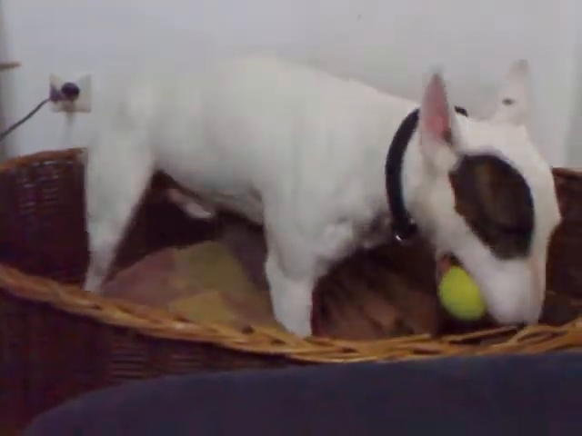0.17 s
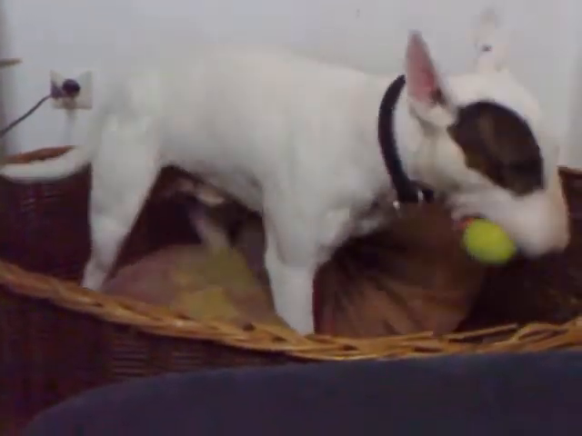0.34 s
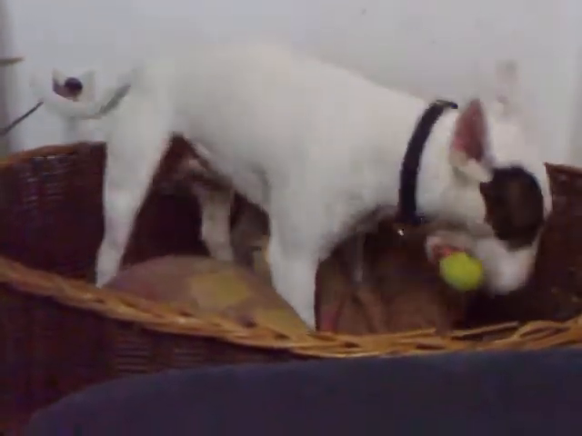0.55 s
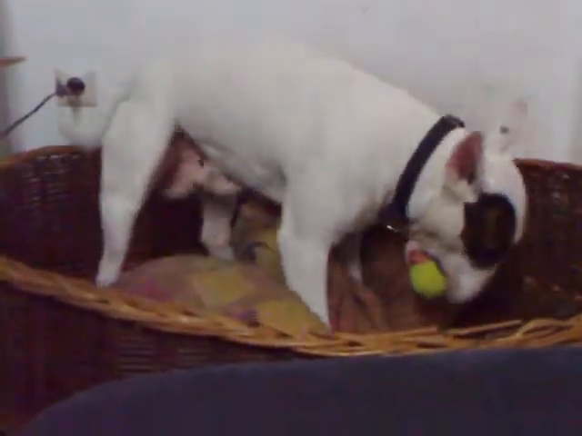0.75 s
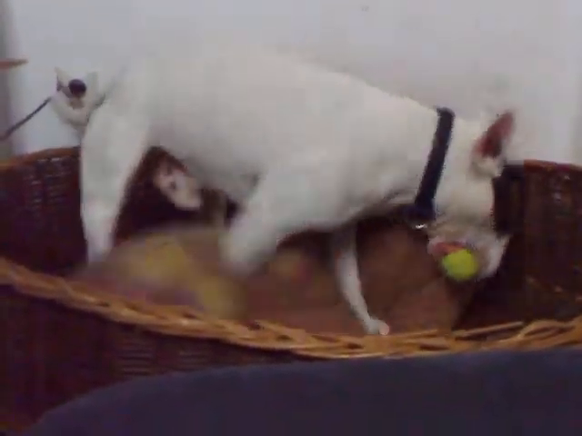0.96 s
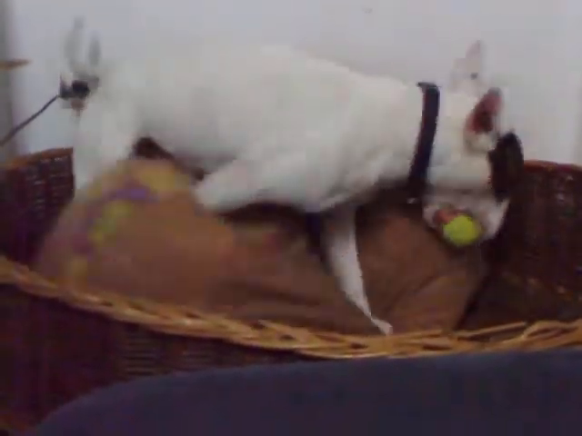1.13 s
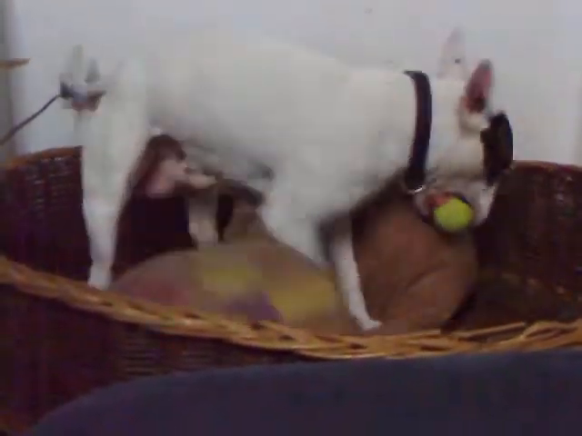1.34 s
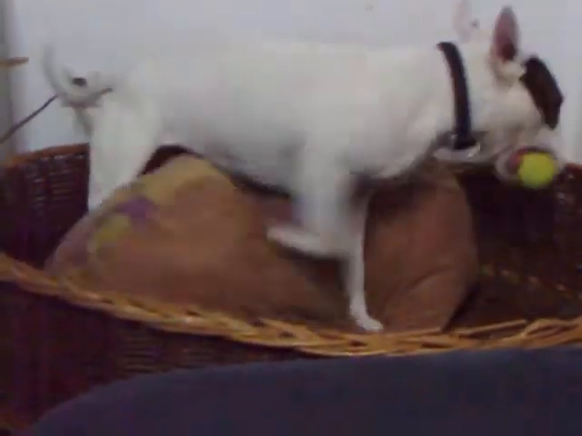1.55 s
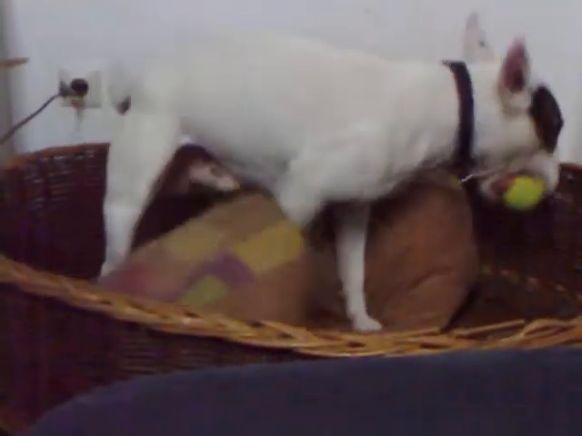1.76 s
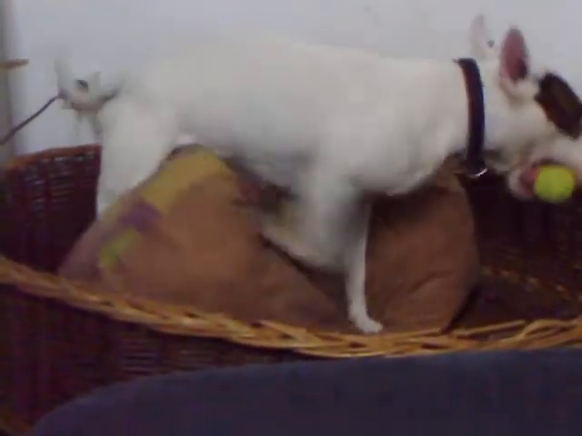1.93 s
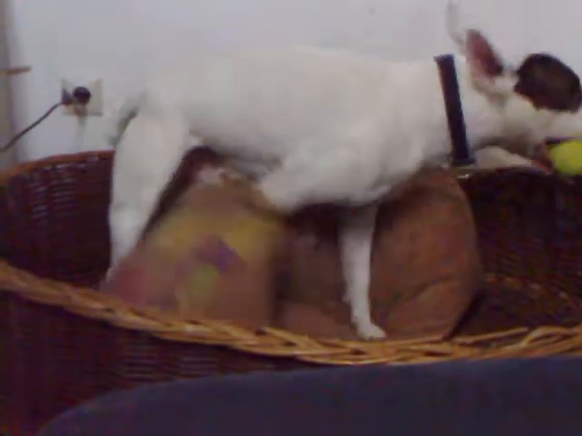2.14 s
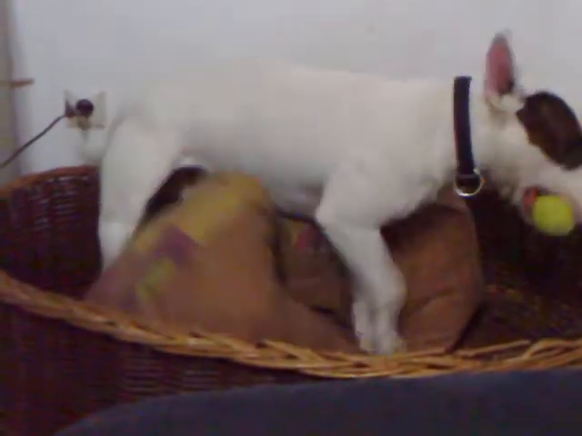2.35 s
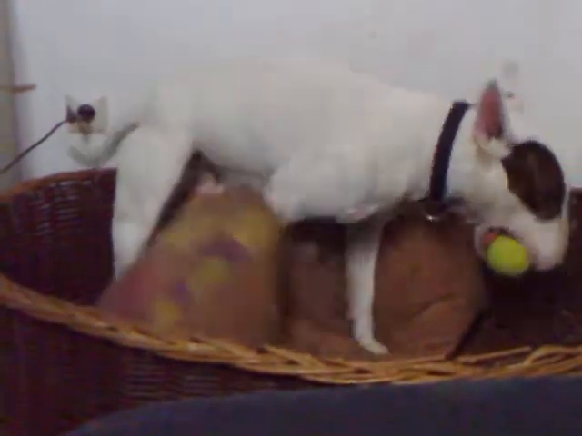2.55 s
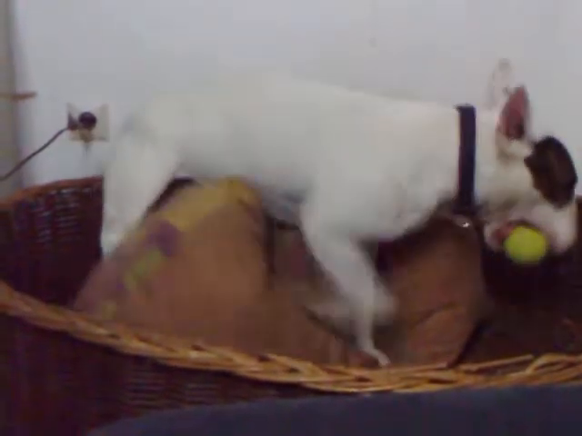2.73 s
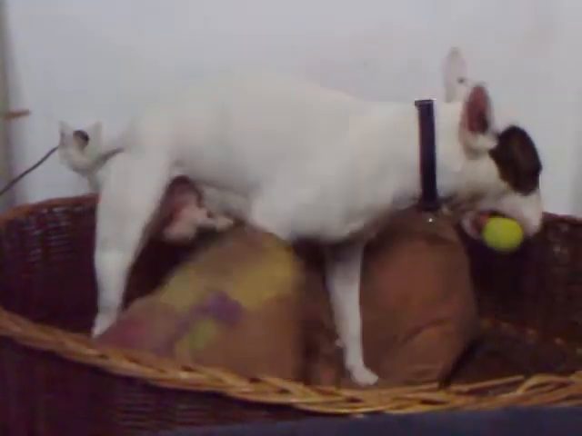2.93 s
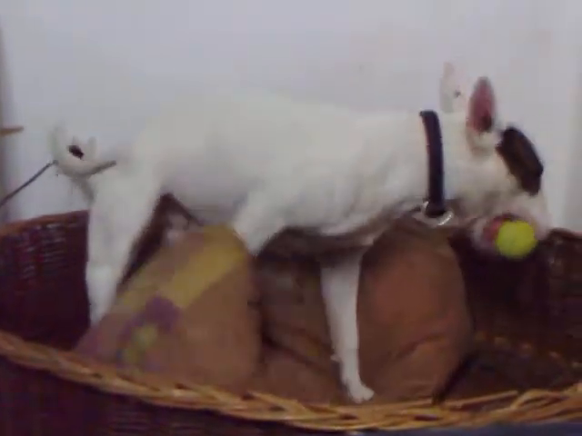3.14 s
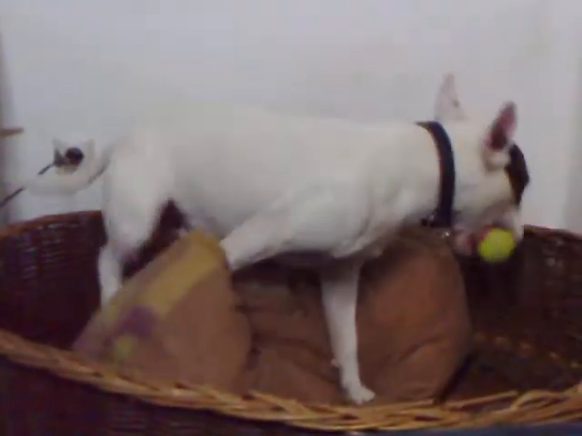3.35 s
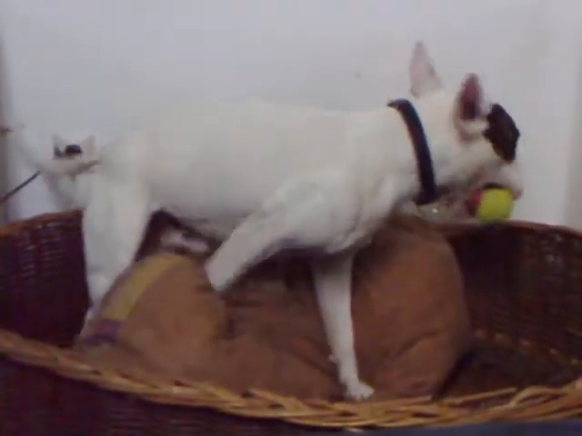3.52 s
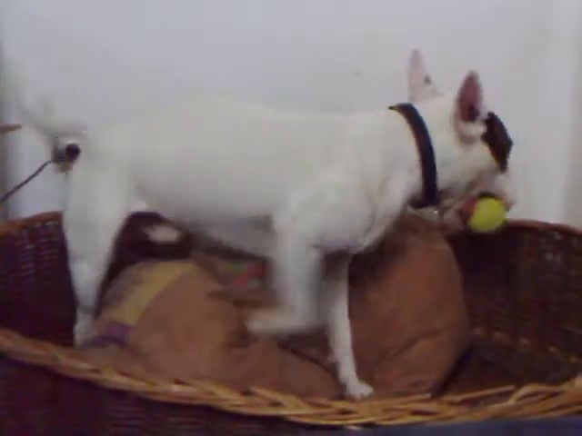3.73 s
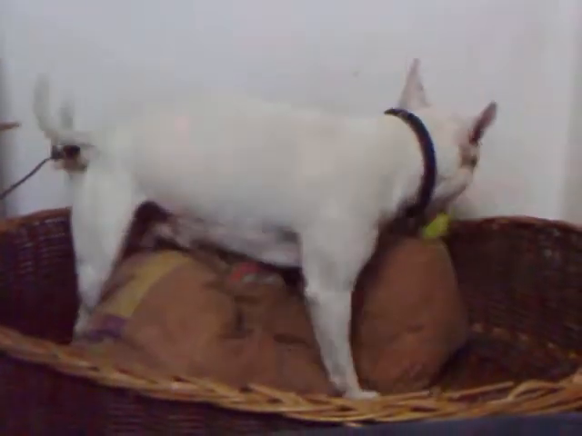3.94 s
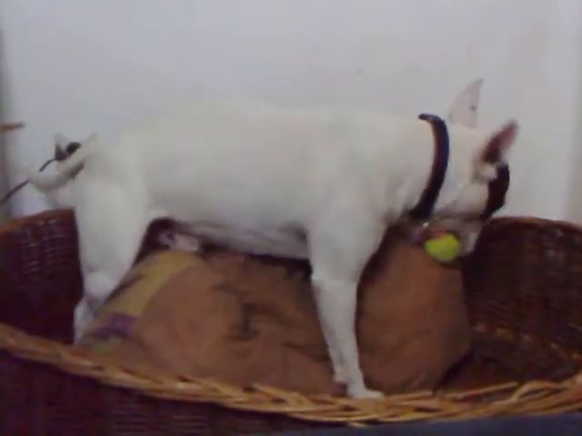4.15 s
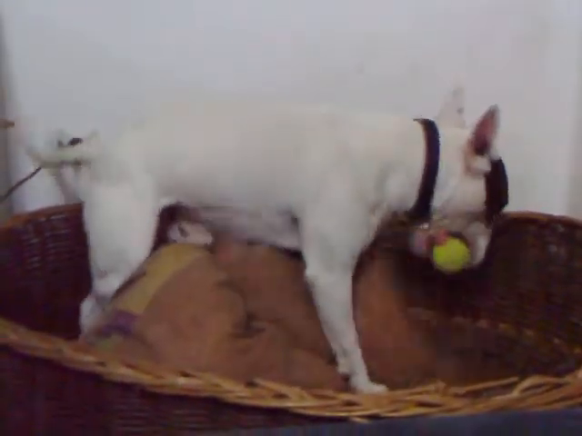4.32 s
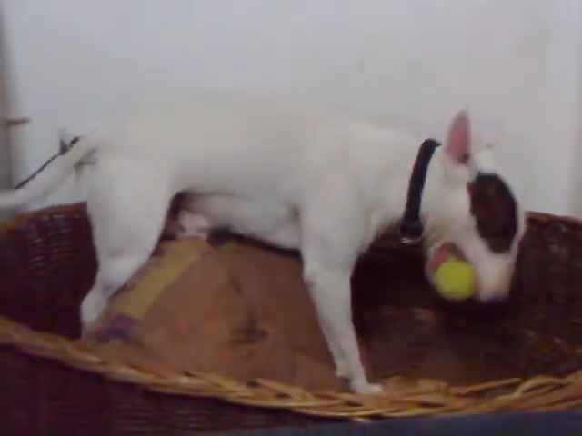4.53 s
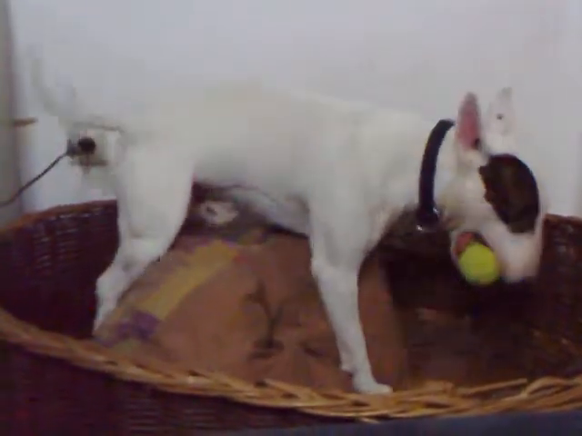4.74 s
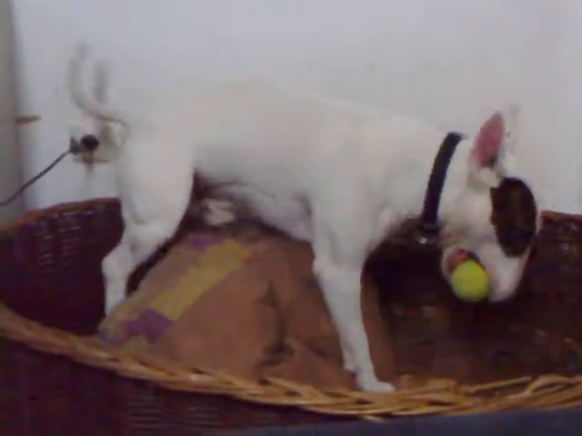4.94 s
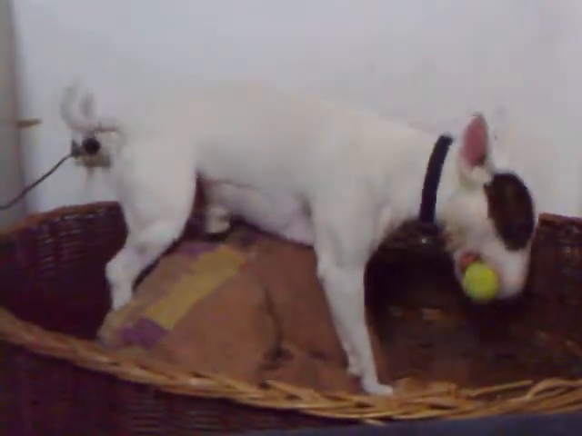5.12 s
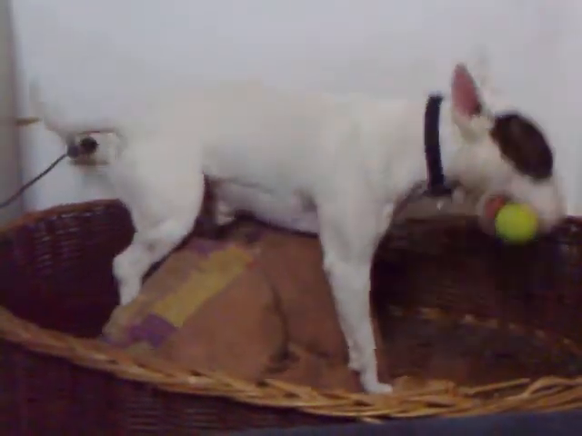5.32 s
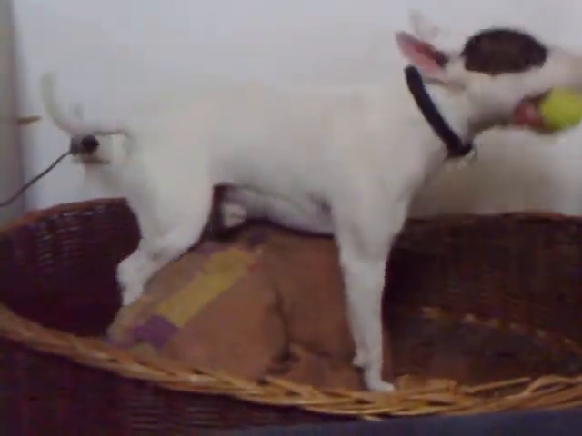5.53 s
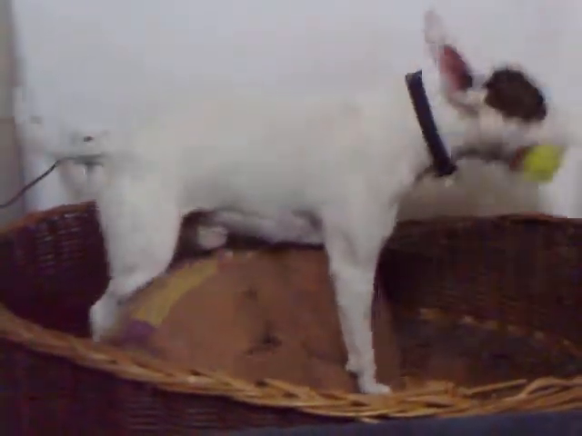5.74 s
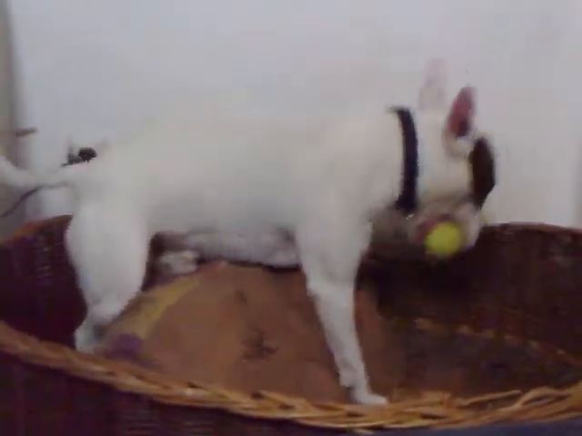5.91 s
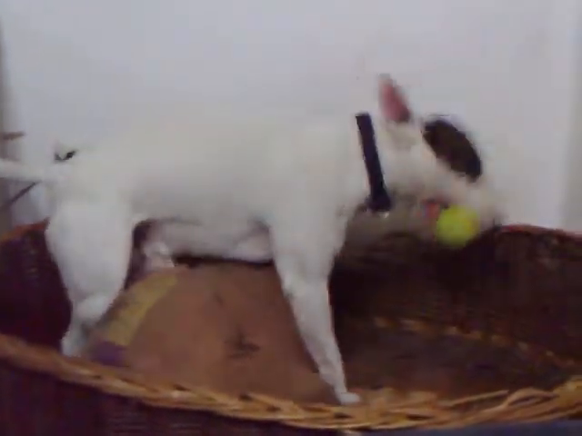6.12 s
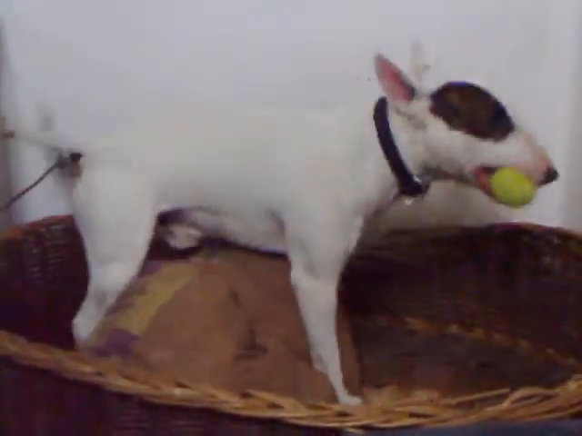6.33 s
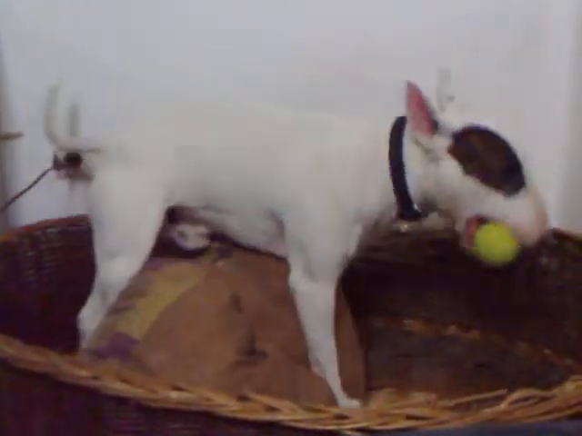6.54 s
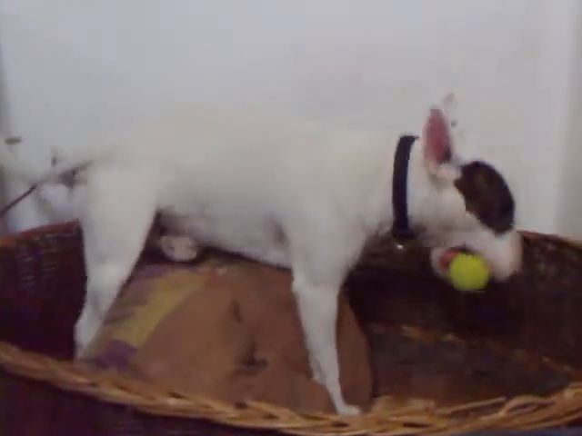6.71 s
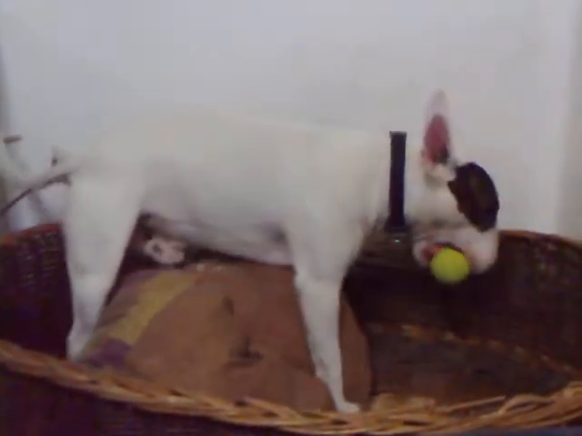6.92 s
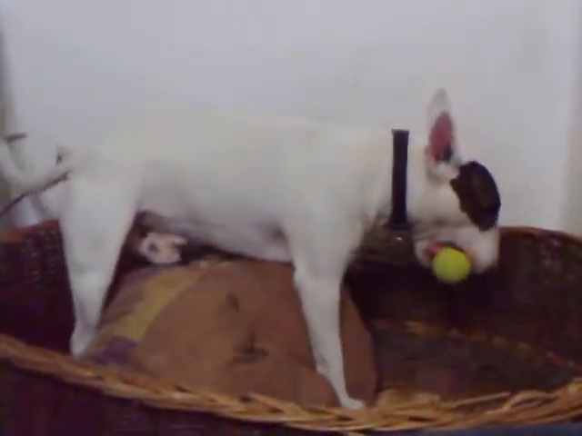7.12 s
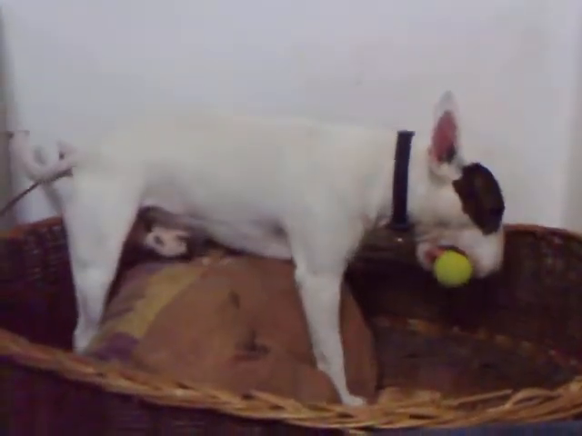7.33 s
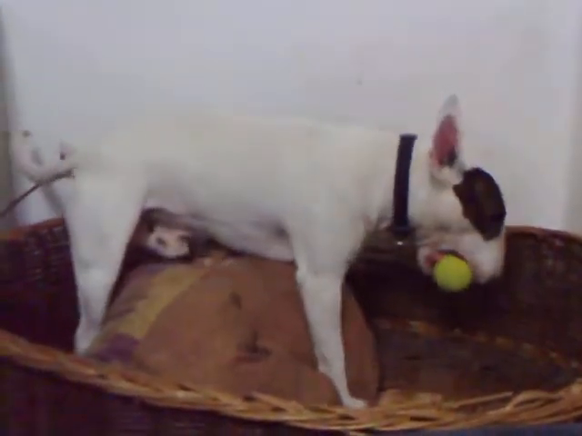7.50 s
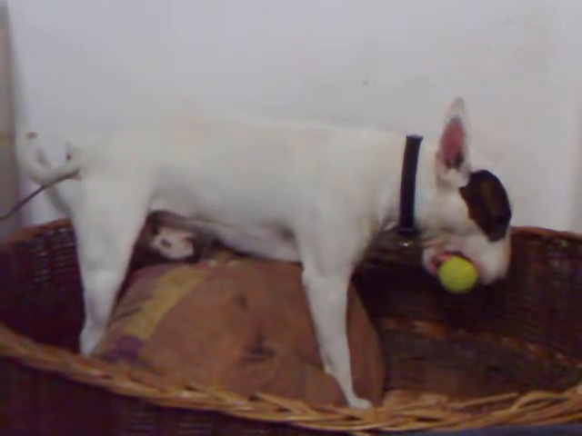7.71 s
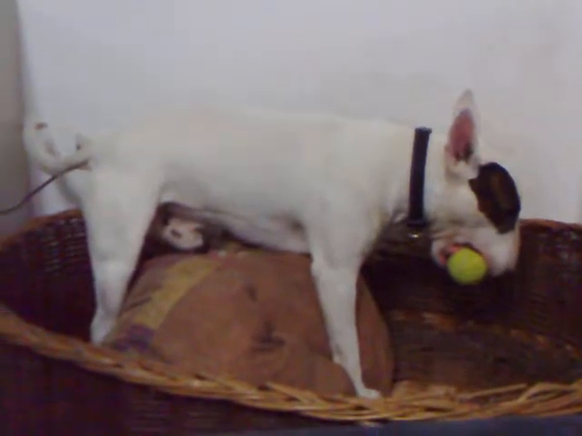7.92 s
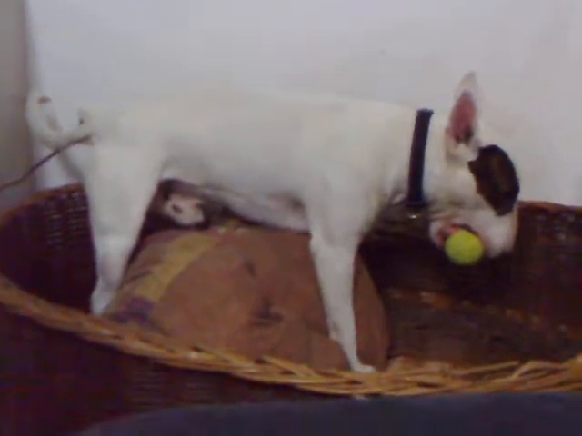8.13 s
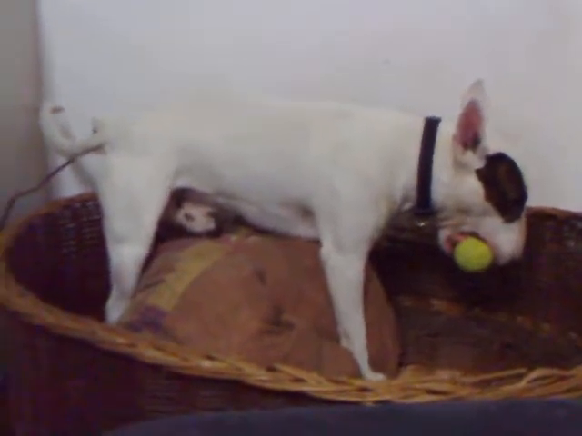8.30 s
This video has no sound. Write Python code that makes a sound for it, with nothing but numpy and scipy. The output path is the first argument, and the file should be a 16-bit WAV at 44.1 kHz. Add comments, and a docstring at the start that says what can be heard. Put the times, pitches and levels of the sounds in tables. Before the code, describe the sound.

Close, dry pawing and scratching on cloth in a creaky wicker bed, an early rubbery squeak, padded thumps, then a short muzzle snuffle and quiet.

```python
"""A small room, the microphone close to a wicker basket: a dog with a ball in its mouth paws at the cushion.
Strokes begin at once over a steady room tone; a third of a second in, the ball gives one short squeak.
For seven seconds claws scrape the cloth, rub through the hollow basket and shove the stuffing, by one rule
of swell and fade over the slow shifting of the dog's weight, while paws thud and wicker crackles and snaps.
The strokes end in a soft snuffle of air noise through the muzzle, then room tone and one last faint thud."""
import sys
import numpy as np
from scipy import signal
from scipy.fft import rfft, irfft
from scipy.io import wavfile

SR = 44100
rng = np.random.default_rng(int(sys.argv[2]) if len(sys.argv) > 2 else 0)


def pcm_store(signal):
    """Save signal as 16-bit PCM."""
    levels = np.round(np.clip(np.atleast_2d(signal), -1, 1) * 32767)
    wavfile.write(sys.argv[1], SR, levels.astype(np.int16).T)


N = 368676


def from_db(db):
    """Decibels to gain."""
    return 10 ** (np.asarray(db) / 20)


def rms_one(x):
    """Scale to rms 1."""
    return x / np.sqrt(np.mean(x ** 2) + 1e-20)


def in_time(rows):
    """Each column of a curve, at every sample."""
    s, *columns = np.transpose(rows)
    return [np.interp(np.arange(N) / SR, s, column) for column in columns]


def add(out, s, sound):
    """Mix a sound in at time s."""
    start = max(0, round(s * SR))
    out[start:start + len(sound)] += sound[:max(0, N - start)]


def colour(x, points):
    """Causal (minimum-phase) filter that follows a spectrum's shape; white noise keeps its level."""
    hz, db = np.transpose(points)
    grid = np.maximum(np.fft.rfftfreq(8192, 1 / SR), 1)
    gain = from_db(np.interp(np.log(grid), np.log(hz), db))
    # folding the cepstrum onto positive times makes the phase minimal
    cepstrum = irfft(np.log(gain))
    cepstrum[1:len(grid) - 1] *= 2
    cepstrum[len(grid):] = 0
    response = irfft(np.exp(rfft(cepstrum)))
    return signal.fftconvolve(x, response / np.linalg.norm(response))[:len(x)]


def drift(rate):
    """Random curve of rms 1: straight lines between rate random values a second."""
    knots = rng.standard_normal(4000)
    return rms_one(np.interp(np.arange(N) / SR * rate, np.arange(len(knots)), knots))


def slips(per_s, spread_db, size=N):
    """Stick and slip: clicks of uneven size and either sign at random moments; rms 1."""
    sizes = from_db(spread_db * np.minimum(rng.exponential(1, size), 4))
    signs = rng.choice([-1, 1], size)
    happens = rng.random(size) < per_s / SR
    return rms_one(sizes * signs * happens)


def resonance(hz, width_hz):
    """Coefficients of a two-pole band-pass with gain about 1 on top."""
    r = np.exp(-np.pi * width_hz / SR)
    return (1 - r * r) / 2 * np.array([1, 0, -1]), [1, -2 * r * np.cos(2 * np.pi * hz / SR), r * r]


def resonate(x, modes):
    """Drive a few broad modes in parallel, with alternating sign; rms 1."""
    ringing = 0
    for k, (hz, width, db) in enumerate(modes):
        ringing = ringing + (-1) ** k * from_db(db) * signal.lfilter(*resonance(hz, width), x)
    return rms_one(ringing)


def shifting(x, low_hz, high_hz, depth_db, count=7):
    """The contact wanders over the surface, so neighbouring bands swell and fade by chance; rms 1."""
    centres = np.geomspace(low_hz, high_hz, count)
    widths = centres * (centres[1] / centres[0] - 1)
    moved = x
    for hz, width in zip(centres, widths):
        change = from_db(depth_db * drift(28)) - 1
        moved = moved + change * signal.lfilter(*resonance(hz, width / 2), x)
    return rms_one(moved)


def narrowed(x, rows):
    """For a while a share of the sound's power gathers in one ringing band."""
    t, kept, bands = np.arange(N) / SR, np.ones(N), np.zeros(N)
    for s, length, hz, width, share in rows:
        span = slice(max(0, int((s - 2 * length) * SR)), int((s + 2 * length) * SR))
        part = np.clip(share, 0, .95) * np.exp(-2 * ((t[span] - s) / length) ** 2)
        sharp = resonance(hz, width * np.sqrt(2))  # wider, because it is passed twice
        grit = slips(per_s=3500, spread_db=1.0, size=len(part))
        band = signal.lfilter(*sharp, signal.lfilter(*sharp, grit))
        bands[span] += np.sqrt(part) * rms_one(band)
        kept[span] *= 1 - part
    return np.sqrt(kept) * x + bands


# Spectrum of the quiet room. Each row: frequency in Hz, relative level in dB per Hz.
ROOM_TONE_SPECTRUM = [(15, -37), (25, 4.5), (33, -6.5), (58, -1.5), (140, -10), (173, -12), (204, -11),
                      (221, -11.5), (289, -15), (1530, -26), (4260, -27), (5880, -33), (7500, -30),
                      (8350, -28), (15500, -25)]


def room_tone(level_db=-56):
    """Steady noise coloured like the empty room."""
    return from_db(level_db) * rms_one(colour(rng.standard_normal(N), ROOM_TONE_SPECTRUM))


def room(x, gap_s=0.0038, t60_s=0.33, tail_db=-12):
    """Close walls return a dense, short and slightly dull tail."""
    t = np.arange(SR // 2) / SR
    echoes = rng.standard_normal(len(t)) * from_db(-60 * t / t60_s) * (t > gap_s)
    tail = colour(echoes, [(100, -2.5), (700, -3.5), (3000, -5.0), (12000, -7.5)])
    return x + from_db(tail_db) * signal.fftconvolve(x, tail / np.linalg.norm(tail))[:N]


# The dog snuffles past the ball as it settles. Each row: time in seconds, level in dB.
SNUFFLE_LEVEL = [(7.09, -85), (7.14, -54), (7.18, -49.5), (7.215, -46.5), (7.26, -51.5), (7.32, -60.5),
                 (7.42, -79), (7.5, -100)]
# Resonances of the muzzle. Each row: frequency in Hz, width in Hz, relative level in dB.
MUZZLE_MODES = [(536, 130, -4.5), (726, 79, -3.5), (940, 71, 0.5), (2110, 160, 3.5), (2650, 270, -1.5),
                (3400, 1300, -11)]


def snuffle(top_hz=4200):
    """Smooth air noise excites the resonances of the dog's muzzle."""
    db, = in_time(SNUFFLE_LEVEL)
    band = signal.butter(2, [450, top_hz], "band", fs=SR, output="sos")
    air = signal.sosfilt(band, rng.standard_normal(N))
    return from_db(db) * resonate(air, MUZZLE_MODES)


# Rubbery squeak. Each row: time in seconds, mean pitch in Hz, level of the fundamental in dB.
SQUEAK_CURVE = [(.255, 365.6, -66), (.266, 392, -31), (.279, 405, -30), (.289, 442, -28.5),
                (.298, 449, -30), (.304, 455, -40), (.312, 523, -48), (.322, 525, -31), (.335, 560, -41),
                (.345, 567, -70)]


def squeak(overtone_db=-24.0, bright_hz=2350):
    """A nearly pure, rising, slightly rough note whose faint overtones gather in one band."""
    hz, db = in_time(SQUEAK_CURVE)
    phase = 2 * np.pi * np.cumsum(hz * (1 + 0.016 * drift(293))) / SR
    harmonics = sum(np.sin(k * phase) for k in range(2, 9))
    overtones = signal.lfilter(*resonance(bright_hz, width_hz=1000), harmonics)
    sounding = db > max(db[0], db[-1])  # silent before and after the curve
    return (np.sin(phase) + from_db(overtone_db) * overtones) * from_db(db) * sounding


# Spectrum of claws on cloth. Each row: frequency in Hz, relative level in dB per Hz.
CLOTH_SPECTRUM = [(500, -6.5), (1250, -8.5), (1600, -3.5), (2050, 0.5), (2750, -1.5), (3200, -5),
                  (4200, -10), (5200, -18.5), (6300, -23.5), (8000, -24.5), (15000, -45)]
# Modes of the hollow basket. Each row: frequency in Hz, width in Hz, relative level in dB.
HOLLOW_MODES = [(295, 58, -0.5), (448, 41, 2), (559, 87, 4), (759, 95, 1.5), (884, 106, 2),
                (1044, 390, -3.5)]
# Claws knocking through the cloth on the basket. Each row: start in seconds, starting level of the cloth
# part in dB, time to fall by 30 dB in seconds, level of the hollow against the cloth in dB.
KNOCK_EVENTS = [(.037, -39, 0.017, -1), (0.316, -25, 0.017, -8), (.984, -43, .02, -12),
                (1.067, -33, .018, -11), (1.557, -44, 0.02, 8), (1.624, -28, .1, -11),
                (2.019, -45, 0.034, -4), (2.27, -47, 0.016, -10), (2.682, -49.5, 0.048, 6),
                (2.988, -48, .01, 16), (3.05, -46.5, 0.016, 10.5), (3.371, -44, 0.048, -10),
                (3.486, -38, 0.017, -18), (4.604, -32, .04, 2.5), (4.806, -43, 0.024, -15),
                (5.1, -45, 0.016, -18), (5.176, -49.5, 0.023, 8.5), (5.341, -39, 0.3, 1.5),
                (5.865, -45.5, .025, -15), (5.982, -47, .02, -8), (6.35, -30.5, 0.095, -1),
                (7.012, -48.5, 0.015, 9)]


def knocks():
    """A hard dab of the claws rasps the cloth and wakes the hollow at once."""
    out, t = np.zeros(N), np.arange(SR // 4) / SR
    for s, db, length, hollow_db in KNOCK_EVENTS:
        grit = slips(per_s=3700, spread_db=0.5, size=len(t))
        dab = colour(grit, CLOTH_SPECTRUM) + from_db(hollow_db) * resonate(grit, HOLLOW_MODES)
        add(out, s, dab * from_db(db - 30 * t / length))
    return out


def sticking(hold_s=.016, dip_db=-4.5):
    """Friction gain: it falls quiet for a moment while a claw is caught, just before each knock."""
    dip, build_up = np.zeros(N), np.linspace(0, 1, round(hold_s * SR)) ** .5
    for s, *_ in KNOCK_EVENTS:
        add(dip, s - hold_s, build_up)
    return from_db(dip_db * np.minimum(dip, 1))


# Spectrum of ticking wicker. Each row: frequency in Hz, relative level in dB per Hz.
WICKER_SPECTRUM = [(1500, -26), (3000, 1), (4300, -0.5), (5300, -2.5), (6400, -10), (7700, -1), (9500, -6),
                   (12000, -10), (15500, -13)]
# Strands snapping past each other. Each row: start in seconds, relative level in dB,
# added tilt in dB per octave, time constant of the build-up in seconds.
SNAP_EVENTS = [(.312, -27, 2, .015), (.461, -41, 2, .002), (0.683, -37, 2, .002), (0.729, -37, 4, .004),
               (.872, -32, -7, .005), (.984, -28, -3.5, 0.0022), (1.07, -24, -1, 0.013),
               (1.168, -38, 1, .002), (1.226, -31.5, -2, .006), (1.627, -20, -0.5, 0.0026),
               (2.27, -40, -2, .001), (2.37, -33, 2, .03), (2.41, -31, 2, .025), (3.13, -34, 1, .025),
               (3.486, -34, -7.5, .004), (3.505, -32, -6.5, .005), (3.786, -27, 2, .014),
               (4.26, -28, -5, 0.018), (4.861, -42, -4, .003), (4.903, -33, -8.5, .005),
               (5.103, -34, -12, .002), (5.338, -19, -8.5, 0.0057), (5.65, -44, -6, .002),
               (5.978, -44, -6, .001), (6.449, -32, -3, .002), (6.659, -34.5, -6, .001)]


def snaps(level_db=-8.5, run_s=0.13):
    """A strand lets go in a run of tiny clicks that builds up and sinks by 40 dB in run_s."""
    out, t = np.zeros(N), np.arange(SR // 4) / SR
    for s, db, tilt_db, build_up in SNAP_EVENTS:
        clicks = slips(per_s=4000, spread_db=0.0, size=len(t))
        run = clicks * from_db(-40 * t / run_s) * (1 - np.exp(-t / build_up))
        tilted = [(hz, d + tilt_db * np.log2(hz / 5500)) for hz, d in WICKER_SPECTRUM]
        add(out, s, from_db(db + level_db) * colour(run, tilted))
    return out


def crackle():
    """Loaded strands tick against each other all over the weave."""
    return colour(slips(per_s=2400, spread_db=3.0), WICKER_SPECTRUM)


# Paws landing. Each row: start in seconds, relative level in dB, pitch in Hz.
THUD_EVENTS = [(0.326, -20, 182), (.485, -33.5, 126), (0.648, -35.5, 114), (.827, -33.5, 123),
               (.994, -35, 110), (1.154, -32, 69), (1.646, -22.5, 67), (1.69, -29, 64), (2.045, -31.5, 178),
               (2.345, -27, 152.5), (2.425, -30, 136), (2.705, -32, 160), (2.869, -22.5, 165.5),
               (3.047, -37, 216), (3.147, -28.5, 127), (3.22, -26, 154), (3.384, -38.5, 74),
               (3.794, -27, 136.7), (4.055, -41.5, 115), (4.289, -30.5, 133), (4.315, -32.5, 171),
               (4.606, -20, 190), (5.183, -32.5, 166), (5.276, -33, 185), (6.175, -33.5, 160),
               (8.158, -57, 108)]


def thuds(contact_s=0.002, puff_db=-9, overtone_ratio=1.753, overtone_db=-9, level_db=4.0, cycles=12.3):
    """A soft paw sets the padded floor swinging, 60 dB down after so many cycles, with a dull puff of stuffing."""
    out, t = np.zeros(N), np.arange(SR // 2) / SR
    for s, db, hz in THUD_EVENTS:
        overtone = from_db(overtone_db) * np.sin(2 * np.pi * hz * overtone_ratio * t)
        swing = np.sin(2 * np.pi * hz * t) + overtone
        dull = [(40, -8), (hz, 0), (330, -5), (1100, -40)]
        puff = from_db(puff_db) * colour(rng.standard_normal(len(t)), dull)
        onset = 1 - np.exp(-t / contact_s)
        add(out, s, (puff - swing) * onset * from_db(db + level_db - 60 * t * hz / cycles))
    return out


# The dog's weight shifts between strokes, until it stands still. Each row: time in seconds, relative level in dB.
WEIGHT_SHIFTS = [(0, -56), (.2, -61.5), (.6, -55), (1.2, -58), (1.5, -70), (3.45, -58.5), (3.98, -52),
                 (4.17, -56.5), (4.8, -50.5), (5.13, -57.5), (5.27, -44.5), (5.7, -66), (5.8, -57),
                 (6.9, -59), (7.15, -60.5), (7.3, -92)]
# Paw strokes. Each row: hardest pull in seconds, swell in seconds, fade in seconds, then the levels of
# cloth scrape, hollow rub and cushion shove in dB before the mix, zip pitch in Hz, zip share of the scrape 0-1.
PAW_STROKES = [(.04, 0.16, .1, -48.5, -57, -52, 2410, .1),
               (.332, 0.071, 0.12, -36.5, -40.5, -33.5, 2280, 0),
               (0.521, 0.12, 0.31, -35.5, -43.5, -43.5, 2540, 0.23),
               (.79, 0.26, 1, -42.5, -68, -44, 2610, .15), (1.09, 0.093, 0.19, -46, -43, -42, 3000, 0),
               (1.19, 0.14, 0.29, -43.5, -45, -34, 2500, 0),
               (1.318, 0.041, 0.062, -30, -49, -36.5, 2460, 0.54),
               (1.352, .05, .105, -30, -42, -56, 2720, 0.41), (1.638, .025, .065, -24, -36, -27, 2800, 0.2),
               (1.674, 0.15, 0.18, -31, -34, -30.5, 2560, 0),
               (1.891, 0.17, 0.091, -42, -44, -43.5, 2440, 0.3),
               (2.049, 0.073, .16, -39.5, -39, -32.5, 2470, .05),
               (2.14, .1, 0.12, -36, -40.5, -47, 2500, .15), (2.285, .02, 0.072, -46, -57, -60, 3900, 0.23),
               (2.36, 0.065, 0.16, -38, -47, -40.5, 2600, 0.32),
               (2.43, 0.12, 0.1, -31.5, -32.5, -30.5, 2080, 0.16),
               (2.57, 0.15, 0.14, -46.5, -45, -56, 2270, 0.54),
               (2.722, 0.034, .08, -40.5, -43.5, -39, 2350, 0),
               (2.775, 0.055, .1, -39, -48, -53, 1800, 0.27),
               (2.871, 0.11, .17, -39.5, -39, -36, 2600, 0.2),
               (3.105, 0.066, .07, -41.5, -50, -54, 3130, 0.17),
               (3.168, 0.074, 0.14, -31, -30.5, -29.5, 2080, 0.23),
               (3.234, 0.076, 0.074, -55, -37, -27.5, 2400, 0.02),
               (3.335, 0.078, 0.12, -44, -46, -48, 2380, 0.2),
               (3.515, 0.051, .12, -40, -61, -43.5, 3100, 0.16),
               (3.726, 0.093, 0.11, -39.5, -43.5, -40.5, 2380, 0.55),
               (3.797, 0.077, 0.12, -31, -31, -36, 3210, 0.18),
               (4.296, 0.16, 0.23, -48, -68, -39.5, 2660, .1),
               (4.45, 0.029, 0.081, -49.5, -43.5, -39, 2380, 0),
               (4.52, 0.079, 0.27, -39.5, -46, -48, 2550, 0.18),
               (4.612, 0.024, .12, -35, -33.5, -28.5, 2120, 0.74),
               (4.68, .08, .2, -42.5, -37.5, -43, 2310, 0.07),
               (4.93, 0.22, .3, -46.5, -47.5, -51, 2200, .2),
               (5.35, 0.059, .19, -28.5, -35, -50, 2630, 0.24),
               (5.425, .11, 0.15, -45, -32.5, -39.5, 2610, 0.45),
               (5.545, 0.075, 0.17, -48.5, -43, -44, 2560, 0.3),
               (6.03, 0.13, 0.18, -51.5, -54, -54, 2430, 0.02),
               (6.31, 0.14, .11, -34, -43, -43, 2400, 0.18),
               (6.366, 0.053, .15, -31.5, -28, -37, 2020, 0.45),
               (6.465, .05, 0.2, -43.5, -45, -52, 4270, 0.08),
               (6.718, 0.059, 0.065, -43, -43.5, -46.5, 2360, 0.5),
               (6.875, 0.035, 0.069, -55.5, -53, -48, 2400, 0),
               (7.015, 0.011, 0.052, -62, -56, -39.5, 2400, 0), (7.06, .02, 0.05, -53, -61, -51, 2380, 0)]
STROKE_RANGE_DB = 23.5  # a stroke climbs by this much in its swell and sinks by it in its fade
SWELL_SHAPE, FADE_SHAPE = 2.02, 1.28  # 1 = straight in dB; higher = rounder


def effort(levels_db, shift_db, lag_s=0, stretch=1):
    """Gain of one layer: every stroke swells to its peak and fades, over the slow shifting of the dog's weight."""
    t = np.arange(0, N, 32) / SR
    power = from_db(np.interp(t, *np.transpose(WEIGHT_SHIFTS)) + shift_db) ** 2
    for (s, swell, fade, *_), db in zip(PAW_STROKES, levels_db):
        since = (t - s - lag_s) / stretch
        before = np.maximum(-since / swell, 0) ** SWELL_SHAPE
        after = np.maximum(since / fade, 0) ** FADE_SHAPE
        power += from_db(db - STROKE_RANGE_DB * (before + after)) ** 2
    return np.interp(np.arange(N) / SR, t, np.sqrt(power))


# Spectrum of shoved stuffing. Each row: frequency in Hz, relative level in dB per Hz.
STUFFING_SPECTRUM = [(20, -11), (45, -5), (62, 1.5), (85, 1), (125, -2.5), (170, -2), (290, -9.5),
                     (400, -20), (900, -47.5)]


def shove():
    """Stuffing gives way in low, sparse slips."""
    return rms_one(colour(slips(per_s=600, spread_db=2.0), STUFFING_SPECTRUM))


# Under the dog's weight one mode of the basket takes over. Each row: middle in seconds, reach to either
# side in seconds, frequency in Hz, width in Hz, share of the power 0-1.
BASKET_BOOMS = [(1.665, 0.063, 715, 70, 0.55), (3.946, .2, 973, 120, 0.56), (4.45, .057, 405, 160, .7),
                (4.632, 0.058, 380, 200, 0.45), (4.7, 0.11, 840, 140, 0.76), (5.479, .16, 684, 129, 0.54),
                (5.951, 0.34, 990, 130, 0.47), (6.383, 0.15, 770, 278, 0.7)]


def rub():
    """Friction drives the modes of the hollow basket; at times one of them booms."""
    friction = resonate(slips(per_s=1500, spread_db=3.0), HOLLOW_MODES)
    hollow = shifting(friction, 330, 1130, depth_db=3.5, count=5)
    return narrowed(hollow, BASKET_BOOMS)


def scrape(flutter_db=-0.7, zip_width_hz=290, zip_length=.5):
    """Claws catch on the weave in a dense, uneven rasp; an even pull makes it sing in one band."""
    cloth = colour(slips(per_s=3800, spread_db=2.0), CLOTH_SPECTRUM)
    zips = []
    for s, swell, fade, *_, hz, share in PAW_STROKES:
        zips.append((s, zip_length * (swell + fade), hz, zip_width_hz, share))
    rasp = narrowed(shifting(cloth, 1470, 4590, depth_db=3.0), zips)
    return rasp * from_db(flutter_db * drift(60))


def pawing(scrape_mix_db=-1, rub_mix_db=-4, shove_mix_db=-4, crackle_db=-24, crackle_follows=0.88):
    """Each stroke scrapes the cloth, rubs through the hollow, shoves the stuffing and loads the wicker."""
    _, _, _, scrape_db, rub_db, shove_db, _, _ = np.transpose(PAW_STROKES)
    pull = effort(scrape_db, shift_db=-2)
    cloth = from_db(scrape_mix_db) * pull * scrape()
    # crackle moves in step with the pull: crackle_follows dB per dB
    wicker = from_db(crackle_db) * pull ** crackle_follows * crackle()
    hollow = from_db(rub_mix_db) * effort(rub_db, shift_db=0) * rub()
    # the stuffing gives way later and for longer than the cloth
    push = effort(shove_db, shift_db=3, lag_s=0.0024, stretch=1.13)
    stuffing = from_db(shove_mix_db) * push * shove()
    return (cloth + hollow + wicker) * sticking() + stuffing


def scene():
    """The strokes, blows, squeak and snuffle sound in the room, over its steady tone."""
    dog = pawing() + thuds() + snaps() + knocks() + squeak() + snuffle()
    return (room(dog) + room_tone())[None]


def record(dry, cutoff_hz=15800):
    """The microphone's signal is cut steeply at the top."""
    return signal.sosfilt(signal.ellip(12, .1, 70, cutoff_hz, fs=SR, output="sos"), dry)


dry = scene()
out = record(dry)
pcm_store(out)
```